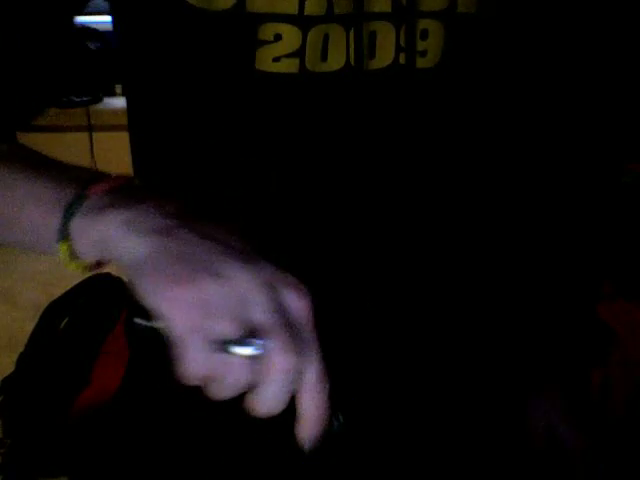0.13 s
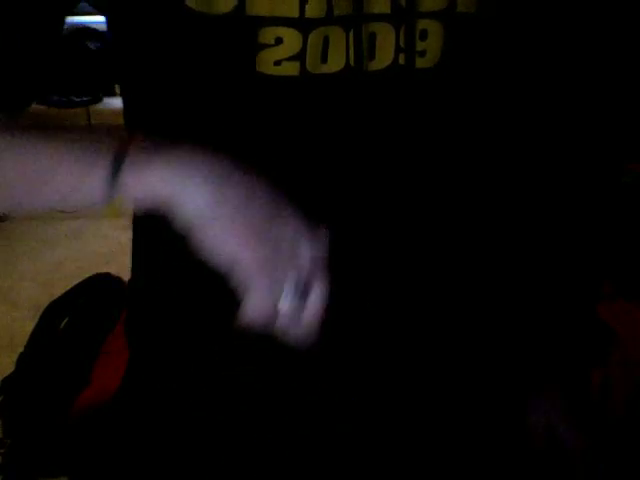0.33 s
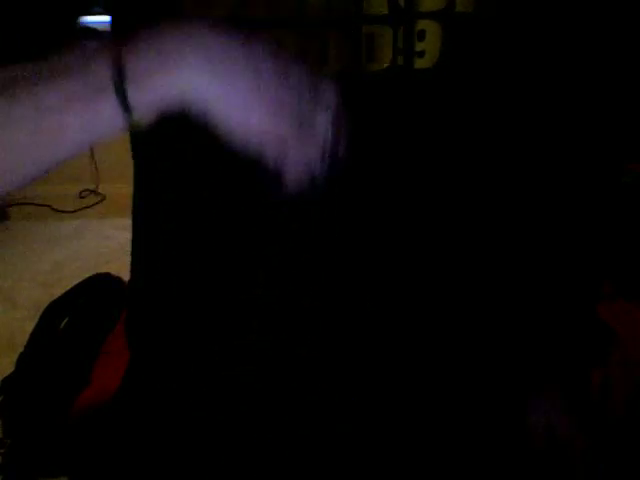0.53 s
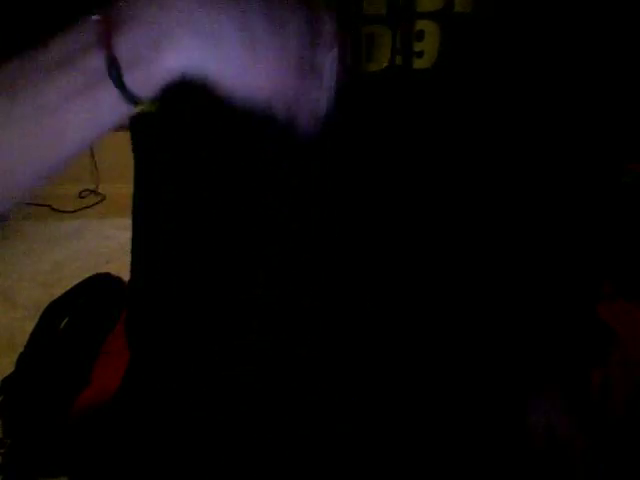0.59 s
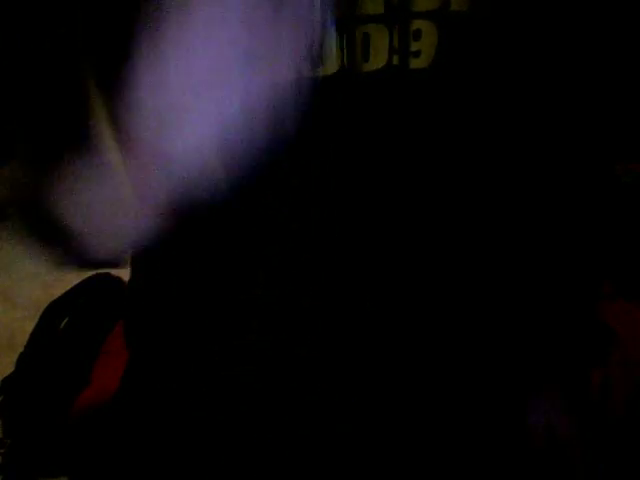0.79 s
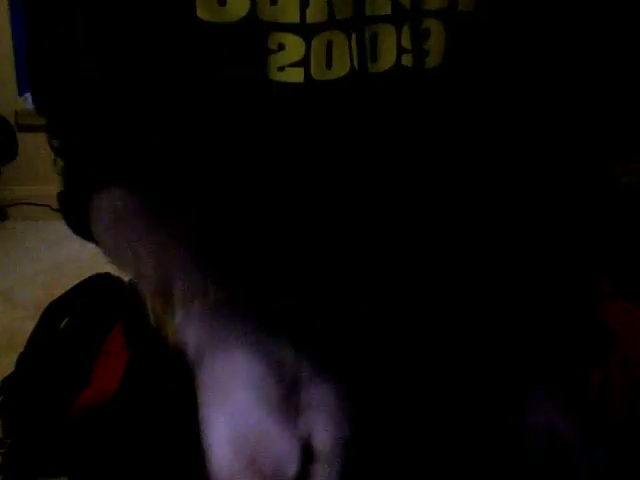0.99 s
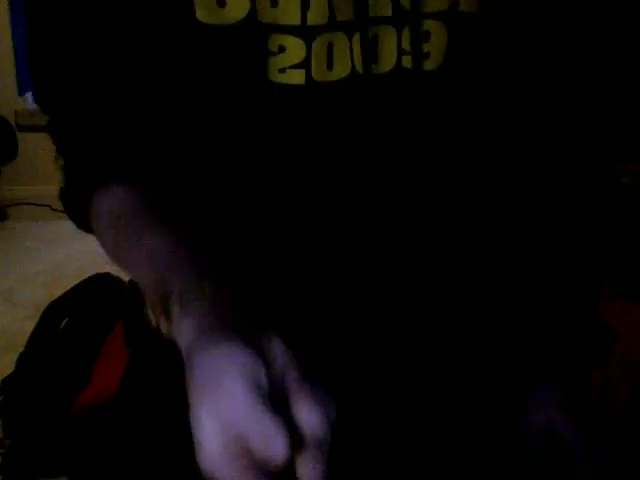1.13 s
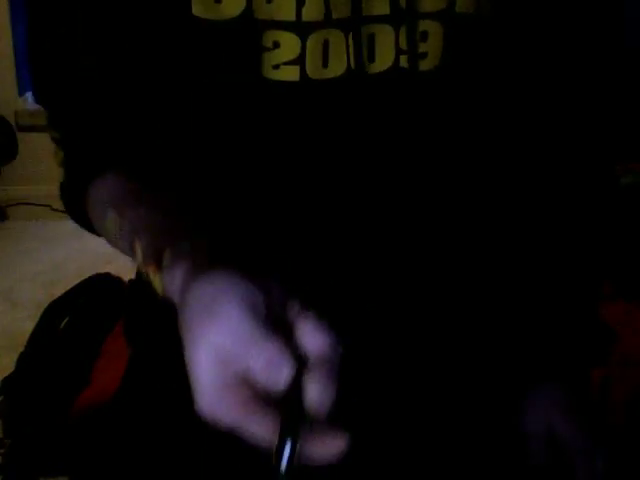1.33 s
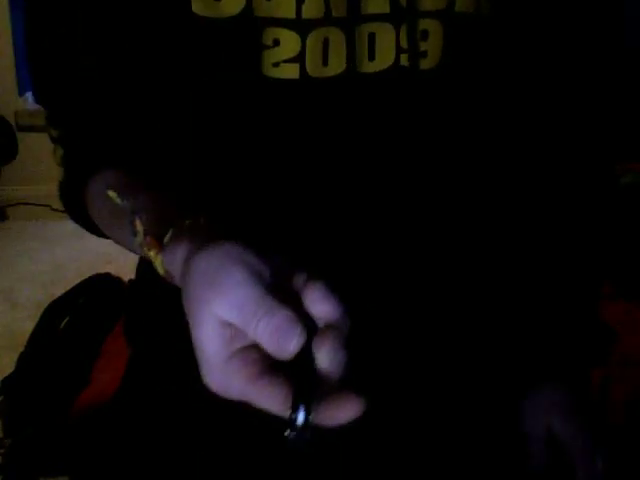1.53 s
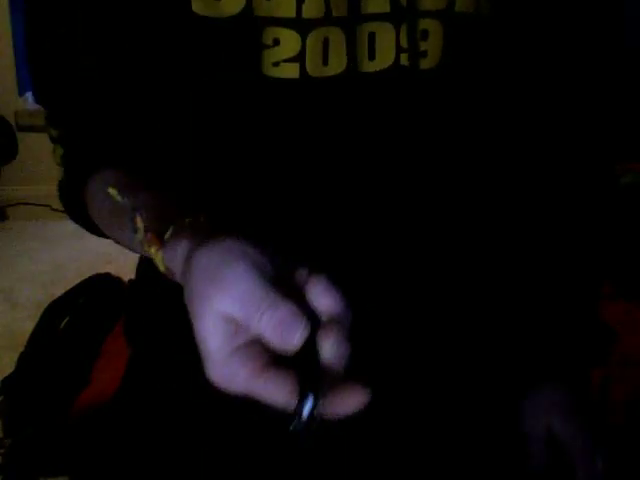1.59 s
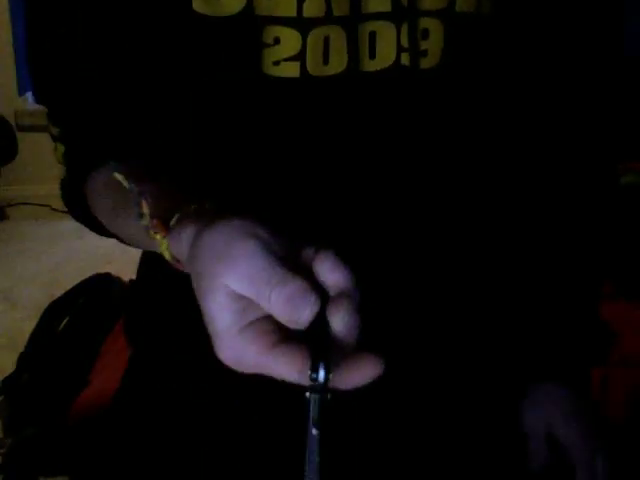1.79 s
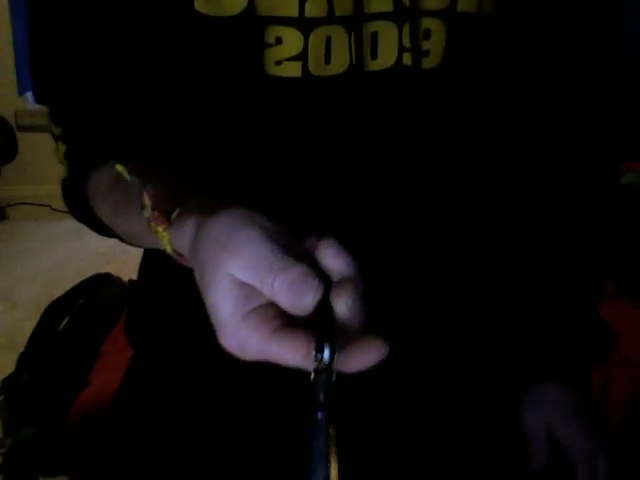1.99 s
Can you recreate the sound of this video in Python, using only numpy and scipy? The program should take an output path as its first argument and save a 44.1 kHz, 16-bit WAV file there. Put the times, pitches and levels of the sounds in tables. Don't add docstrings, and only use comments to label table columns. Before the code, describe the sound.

A two-handled folding knife is flipped closed near a cheap webcam microphone: small ticks, a bright blade ring, a sharp burst of metal clacks, then lighter rattles and soft hand bumps over room hum and pulsing whine.

```python
import sys
import numpy as np
from scipy import signal
from scipy.fft import rfft, irfft
from scipy.io import wavfile
from scipy.ndimage import uniform_filter1d

SR = 44100
rng = np.random.default_rng(int(sys.argv[2]) if len(sys.argv) > 2 else 0)


def undo_db(level):
    steps = np.asarray(level, float) / 20
    return 10 ** steps


def store_pcm(level_fs):
    pcm = np.round(np.clip(level_fs, -1, 1) * 32767).astype(np.int16)
    wavfile.write(sys.argv[1], SR, np.atleast_2d(pcm).T)


N = 92610
T = np.arange(N) / SR


def evened(x):
    return x / np.sqrt(np.mean(x ** 2) + 1e-20)


def read(points, hz):
    f, value = np.transpose(points)
    return np.interp(np.log(hz + 1), np.log(f + 1), value)


def add(mix, start_s, sound):
    part = mix[round(start_s * SR):][:len(sound)]
    part += sound[:len(part)]


def coloured(x, points):
    size = x.shape[-1]
    gain = undo_db(read(points, np.fft.rfftfreq(size, 1 / SR)))
    return irfft(rfft(x) * gain, size)


def fuzzy(hz, width_hz, size):
    warm_up = 4000
    noise = rng.standard_normal(size + warm_up) + 1j * rng.standard_normal(size + warm_up)
    r = np.exp(-np.pi * width_hz / SR)
    wander = signal.lfilter([1], [1, -2 * r, r * r], noise)[warm_up:]
    wander = wander / np.sqrt(np.mean(abs(wander) ** 2))
    return evened(((wander + 1) * np.exp(2j * np.pi * hz * T[:size])).real)


def ring(hz, db, t60, t):
    return (undo_db(db - 60 * t / t60) * np.sin(2 * np.pi * hz * t)).sum(0)


# (frequency [Hz], level [dB per Hz])
AIR_SPECTRUM = [(20, -18), (50, -2), (150, -1.5), (450, -7), (700, -10), (1300, -15), (2500, -24),
                (4000, -35)]
# (frequency [Hz], level [dB per Hz])
HISS_SPECTRUM = [(1500, -12), (2700, 1), (3600, -10), (5700, 3), (8000, 0.5), (11000, -8), (15600, -13),
                 (15900, -58)]
# (frequency [Hz], likeness [0 to 1])
STEREO_LIKENESS = [(30, 1), (250, 0.97), (1000, .9), (3000, 0.92), (8000, 0.7), (15000, 0.27)]


def air():
    a, b = rfft(rng.standard_normal((2, N)))
    same = np.clip(read(STEREO_LIKENESS, np.fft.rfftfreq(N, 1 / SR)), 0, 1)
    mid = a * np.sqrt((1 + same) / 2)
    side = b * np.sqrt((1 - same) / 2)
    noise = irfft(np.array([mid + side, mid - side]), N)
    rumble = evened(coloured(noise, AIR_SPECTRUM))
    hiss = evened(coloured(noise, [(600, -22)] + HISS_SPECTRUM))
    return undo_db(-56) * rumble + undo_db(-72.5) * hiss


# (frequency [Hz], level [dB rms])
HUM_LINES = [(60, -69.5), (120, -55), (770, -77), (1160, -81.5)]


def hum():
    flutter_db = rng.standard_normal(N)
    for _ in range(2):
        flutter_db = uniform_filter1d(flutter_db, size=3000)
    flutter_db = 1.44 * evened(flutter_db)
    lines = np.zeros(N)
    for hz, db in HUM_LINES:
        lines += undo_db(db + 2) * np.sin(2 * np.pi * (hz * T + rng.random()))
    return undo_db(flutter_db) * lines


# (frequency [Hz], level [dB rms])
BUZZ_LINES = [(4947, -85), (9846, -83), (10594, -83), (11052, -80), (11499, -84), (11789, -83),
              (12209, -84), (12505, -85), (12950, -78), (13350, -86), (13695, -87), (14100, -92),
              (15550, -91)]
# (frequency [Hz], level [dB per Hz])
BURST_HISS_SPECTRUM = [(2000, -6), (5000, 0.5), (9000, 4), (13000, 8), (15600, -12), (15900, -56)]


def electronics():
    frame_s, first_s, on_s, edge_s = .066755, .0171, .033, .0014
    whine_hz, scan_hz, line_width_hz = 7999.9, 15235, 14
    since_first = T - first_s
    on = uniform_filter1d(1. * (since_first % frame_s < on_s), int(edge_s * SR))
    burst = undo_db(-53.5) * np.cos(2 * np.pi * whine_hz * T + 1)
    for hz, db in BUZZ_LINES:
        burst += undo_db(db) * fuzzy(hz, line_width_hz, N)
    scan = 2 * np.pi * scan_hz * T
    burst += undo_db(-80) * np.sin(scan + 2 * 2 * np.pi * since_first / frame_s + 1.4)
    a, b = rng.standard_normal((2, N))
    hiss = np.array([a + 0.1 * b, a - 0.1 * b])
    burst = burst + undo_db(-67) * evened(coloured(hiss, BURST_HISS_SPECTRUM))
    scan_gain = 1 - on + 1.25 * on
    return on * burst + undo_db(-69) * scan_gain * np.sin(scan)


# (time [s], pitch [Hz])
BUMP_STARTS = [
    (1.01, 150),
    (1.105, 150),
    (1.125, 210),
    (1.29, 150),
    (1.385, 85),
    (1.755, 170),
    (1.795, 190),
    (1.815, 150),
]
# (level [dB], t60 [s])
BUMP_DECAYS = [(-53, 0.16), (-46.5, 0.52), (-50, 0.25), (-52, 0.16), (-46, 0.38), (-53, 0.32), (-51, 0.26),
               (-51.5, 0.22)]


def bumps():
    out, t = np.zeros(N), T[:SR // 3]
    rise = np.minimum(t / 0.0054, 1)
    for (start_s, hz), (db, t60) in zip(BUMP_STARTS, BUMP_DECAYS):
        add(out, start_s, undo_db(db - 60 * t / t60) * fuzzy(hz, 51, len(t)) * rise)
    return out


# (time [s], pitch [Hz])
SQUEAK_STARTS = [(.885, 8250), (1.199, 8450), (1.216, 8480), (1.248, 5900), (1.553, 5885), (.954, 3700),
                 (1.015, 8200), (.96, 4750), (.175, 3400), (.253, 1330), (.953, 1550), (1.105, 1700),
                 (.18, 8200), (1.227, 8480), (1.615, 5800), (.853, 5600), (1.835, 2080), (1.253, 8450)]
# (length [s], level [dB], share of the length spent swelling [0 to 1])
SQUEAK_SHAPES = [(0.064, -59, .13), (.016, -48.5, 0.5), (0.011, -51, .2), (0.02, -64, .2),
                 (0.066, -63, 0.091), (0.0055, -50, .2), (0.011, -51, .13), (0.018, -51, 0.15),
                 (0.0063, -53.5, .13), (0.012, -54.5, 0.17), (0.019, -56, 0.16), (0.011, -59, .13),
                 (0.022, -63, .13), (0.029, -54.5, .3), (0.037, -70, .2), (.018, -56, .4),
                 (0.032, -68.5, 0.24), (0.034, -77, .2)]


def squeaks():
    out = np.zeros(N)
    for (start_s, hz), (length_s, db, swell) in zip(SQUEAK_STARTS, SQUEAK_SHAPES):
        u = T[:int(length_s * SR)] / length_s
        shape = np.minimum(u / swell, 1) * (1 - u ** 4)
        add(out, start_s, undo_db(db) * fuzzy(hz, 180, len(u)) * shape)
    return out


BLADE_PITCHES = [4565, 4570, 5926, 8183, 8190, 10450, 11845, 11875, 13750, 7467]
# (level [dB], t60 [s])
BLADE_DECAYS = [(-28, .9), (-42, .5), (-12, .07), (-3.5, .29), (-19, .6), (-12, .035), (-4, .05), (-35, .3),
                (-22, .04), (-20, .1)]
# (time [s], level [dB], t60 [s])
LATE_RINGS = [
    (1.145, -63, .7),
    (.957, -54, .12),
]
FREE_RING_S = .6


def blade():
    out, t = np.zeros(N), T[:SR // 2]
    catch_s, catch_db, rise_s = .108, -9, .002
    db, t60 = np.transpose(BLADE_DECAYS)[:, :, None]
    free = ring(np.c_[BLADE_PITCHES], db - 26.5, t60, t)
    caught = undo_db(catch_db * np.clip((t - catch_s) * 60, 0, 1))
    add(out, FREE_RING_S, free * np.minimum(t / rise_s, 1) * caught)
    for start_s, ring_db, ring_t60 in LATE_RINGS:
        add(out, start_s, undo_db(ring_db - 60 * t / ring_t60) * np.sin(2 * np.pi * BLADE_PITCHES[0] * t))
    return out


# (frequency [Hz], level [dB])
HANDLE_MODES = [(1350, -14), (3600, -8), (4800, -29), (5300, -5), (5730, 2.5), (6700, -8), (7520, 3),
                (8250, -1.5), (9300, -18), (10250, 3.5), (11850, -5), (13900, -14)]
# (frequency [Hz], level [dB per Hz])
CRACK_SPECTRUM = [(500, -19.5), (1500, -29), (2800, -12.5), (4100, -14.5), (5200, -5.5), (7400, 0),
                  (10300, -1.5), (16000, -18)]
# (frequency [Hz], level [dB per Hz])
JANGLE_SPECTRUM = [(3000, -17), (4200, -18.5), (4700, -1), (7600, -5), (10500, -27), (14000, -17)]


def blow(start_s, peak_db, hz, burst_ms, wide_db, jangle_t60=0.2):
    t = T[:SR // 4]
    size, lead = 2048, 256
    ms = np.maximum(T[:size] - T[lead], 0) * 1000
    wide = undo_db(wide_db)

    grit = undo_db(2 * rng.standard_normal(128)).repeat(16)
    contact = rng.standard_normal(size) * grit * (1 - np.exp(-ms / 0.071)) * np.exp(-ms / max(burst_ms, .1))
    contact[260] = 3.5

    r = np.exp(-np.pi * 1000 / SR)
    poles = [1, -2 * r * np.cos(2 * np.pi * hz / SR), r * r]
    spot = signal.lfilter([1, 0, -1], poles, signal.lfilter([1], poles, contact))
    crack = coloured(contact, CRACK_SPECTRUM)
    crack = wide * crack / abs(crack).max() + undo_db(-3.5) * spot / abs(spot).max()

    mode_hz, db = np.transpose(HANDLE_MODES)[:, :, None]
    level_luck, tune_luck = rng.standard_normal((2, len(HANDLE_MODES), 1))
    octaves_off = np.log2(mode_hz / hz)
    db = db - 20 + 1.5 * level_luck - 3 * np.minimum(octaves_off ** 2, 2)
    body = ring(mode_hz * (1 + .012 * tune_luck), db, .028, t[:size])

    grain = undo_db(3.5 * rng.standard_normal(len(t) // 64 + 1)).repeat(64)[:len(t)]
    jangle = evened(coloured(rng.standard_normal(len(t)) * grain, JANGLE_SPECTRUM))
    jangle = jangle * undo_db(-29.5 - 60 * t / jangle_t60)

    out = np.zeros(len(t))
    out[:2 * size - 1] = wide * signal.fftconvolve(body, contact / np.linalg.norm(contact))
    out[300:] += wide * jangle[:-300]
    out[:size] += crack
    return start_s - T[lead] + .0002, undo_db(peak_db - 2) * out


# (time [s], peak level [dB], pitch [Hz], burst [ms], wide crack [dB])
LIGHT_TICKS = [(0.177, -38.5, 5800, 1.8, 2.5), (0.2003, -41.5, 6260, 4.7, -14.5),
               (0.2125, -39, 5930, 4.1, -15), (0.405, -39.5, 7000, 2.9, -15), (0.4713, -41, 6270, 3, -10),
               (0.5773, -41, 6160, 8.6, -6.5), (1.0022, -38, 6350, 1.6, 0), (1.013, -31.5, 5700, 2.7, -4),
               (1.1084, -41, 7130, 2.5, -15), (1.118, -44, 5800, 2.3, -17), (1.1449, -40, 7600, 2.5, 6),
               (1.5526, -50, 5240, 2, 4), (1.726, -50, 6900, 2.3, -10), (1.736, -46, 6000, 2.8, -3),
               (1.74, -48.5, 6000, 2.5, 1.5), (1.8881, -50, 6000, 2.9, -5), (0.853, -40, 8300, 5.4, 4),
               (0.737, -51, 6500, 2, 1)]
# (time [s], peak level [dB], pitch [Hz], burst [ms], wide
# crack [dB])
HANDLE_CLACKS = [(.2542, -32, 5000, 1.9, 8), (.2582, -32.5, 7700, 1.6, 6.5), (.2652, -29, 6430, 1.7, 1),
                 (.3327, -46, 7500, 1, 2), (.3346, -39.5, 6700, 2.2, 8), (.444, -38, 5270, 2.9, 4.5),
                 (0.4473, -38, 6200, 2.8, -3), (.8189, -27.5, 8160, 0.84, -3), (.8203, -30.5, 7400, 1.6, 0),
                 (.8256, -23, 7260, .5, -6), (.8268, -20.5, 5750, 1.3, -6), (.8292, -27, 6000, 1.2, -1),
                 (.8315, -15.5, 7260, 0.33, -3), (.8326, -18, 5730, 1.07, -0.5),
                 (.8344, -20, 8030, 0.79, -1), (.8358, -25, 5740, 1.1, 6), (.8377, -26, 5400, 0.71, -12),
                 (.8412, -41, 5860, 1.5, -4), (.8755, -25, 8900, 0.42, 3), (.8772, -37, 6000, .7, 1),
                 (.951, -25.5, 6900, .7, -9), (0.9553, -27, 5860, .8, 1), (0.9574, -22, 6500, 0.66, -13),
                  (0.959, -18, 7280, 0.92, -8), (0.9607, -18, 8750, 0.55, 0.5),
                  (0.962, -22.5, 7500, 1.7, -17), (.9764, -35, 7050, .3, -10),
                  (0.9762, -19.5, 9470, 0.53, -19), (0.979, -39, 10000, 2, -3),
                  (1.0177, -34, 5840, 0.89, -11), (1.0192, -35, 8100, 1.2, -1), (1.022, -31, 7960, 2, -2),
                  (1.0372, -25, 8000, 0.68, -7.5), (1.0394, -19, 7880, 0.69, -3),
                  (1.0424, -27.5, 5900, 0.84, -12), (1.1287, -32.5, 6050, 2, 4),
                  (1.1328, -39, 5730, 0.84, 4), (1.1365, -33, 7440, 1.4, 4.5),
                  (1.1402, -34.5, 10300, 0.48, 6), (1.1426, -30.5, 6140, 2.5, -6),
                  (1.132, -35, 11900, 3.7, -10), (.837, -35, 13900, 3.5, -27), (.265, -35, 11900, 3, -15),
                  (0.257, -29.5, 10040, 2.6, -18)]
# (peak level [dB], pitch [Hz], burst [ms], wide crack [dB], jangle t60 [s])
BLADE_BLOW = (-25.5, 10412, 1.5, 7, 0.52)


def knife():
    out = blade() + squeaks()
    for row in LIGHT_TICKS + HANDLE_CLACKS + [(FREE_RING_S, *BLADE_BLOW)]:
        add(out, *blow(*row))
    return out


# (frequency [Hz], t60 [s])
ROOM_DECAY = [(1000, 1), (4000, 0.29), (5500, 0.26), (8000, 0.31), (14000, 0.14)]


def room(x):
    taps = np.zeros((2, SR // 2))
    at = np.arange(100, SR // 2 - 12, 12)
    for channel in taps:
        channel[at + rng.integers(0, 12, len(at))] = rng.choice([-1., 1.], len(at))
    stereo = np.array([taps[0] + 0.042 * taps[1], taps[0] - 0.06 * taps[1]])
    hz, t, z = signal.stft(stereo, SR, nperseg=256)
    fade = undo_db(-60 * t / read(ROOM_DECAY, hz)[:, None])
    tail = signal.istft(z * fade, SR, nperseg=256)[1]
    return signal.fftconvolve(x[None], tail / np.linalg.norm(tail[0]), axes=1)[:, :N]


def scene():
    steel = knife()
    return air() + hum() + electronics() + bumps() + steel + undo_db(-12) * room(steel)


def roll_off(x):
    return signal.sosfilt(signal.butter(12, 16800, fs=SR, output="sos"), x)


def record(dry):
    lag_samples, edge_hz = 0.48, 15900
    hz = np.fft.rfftfreq(N, 1 / SR)
    lag = np.exp(-1j * np.pi * hz / SR * lag_samples * np.array([[1], [-1]]))
    mix = irfft(rfft(dry) * lag / (1 + (hz / edge_hz) ** 90), N)
    return roll_off(mix)


dry = scene()
out = record(dry)
store_pcm(out)
```